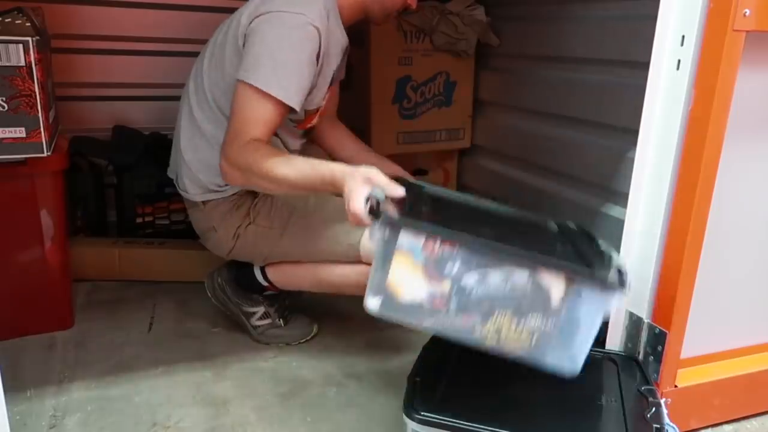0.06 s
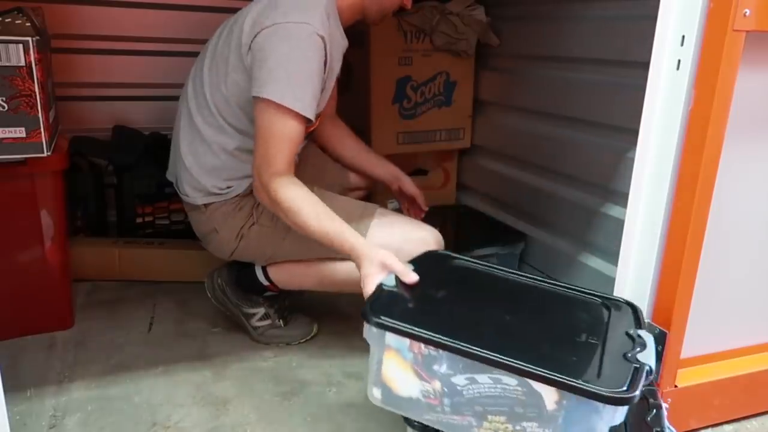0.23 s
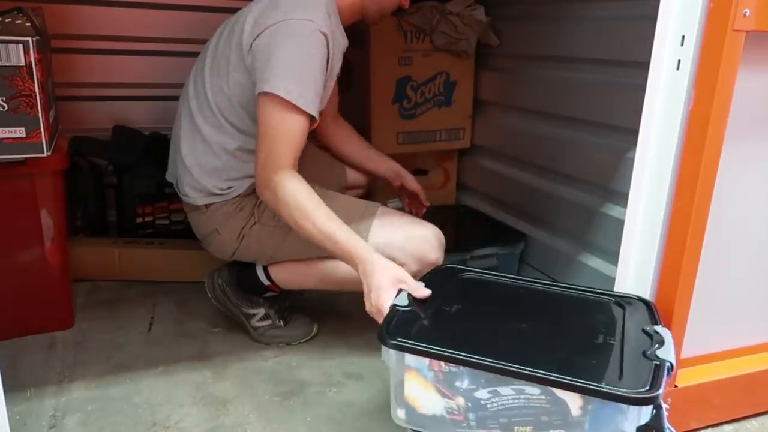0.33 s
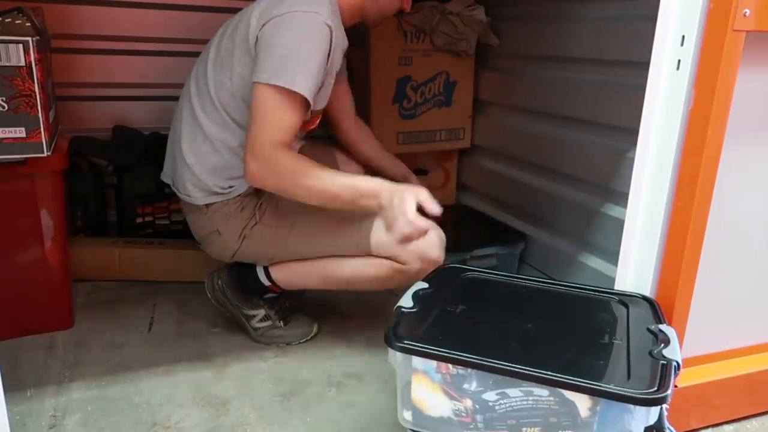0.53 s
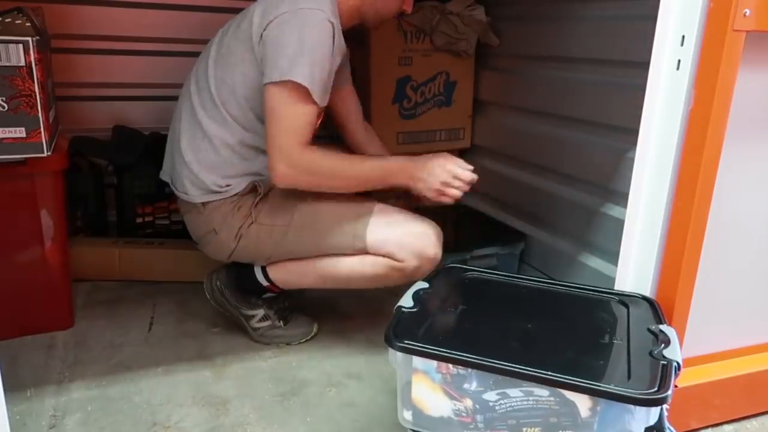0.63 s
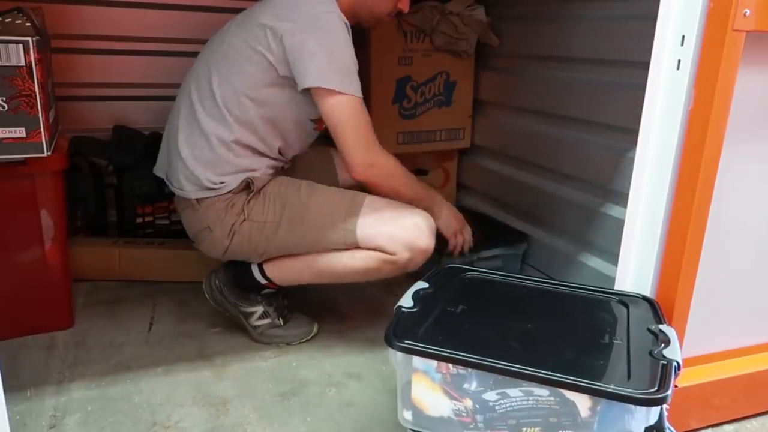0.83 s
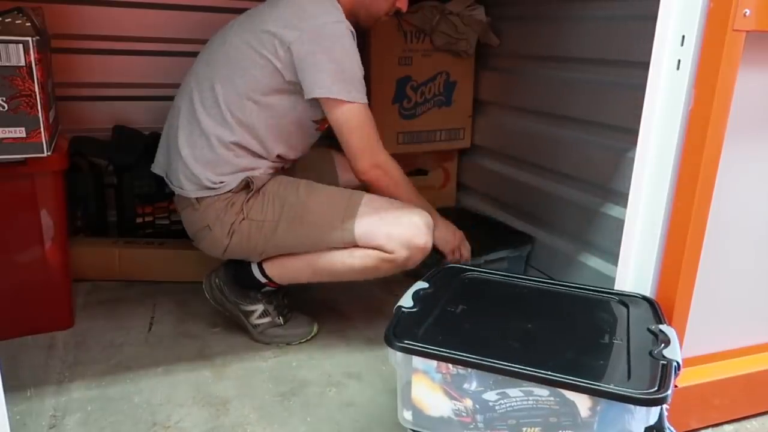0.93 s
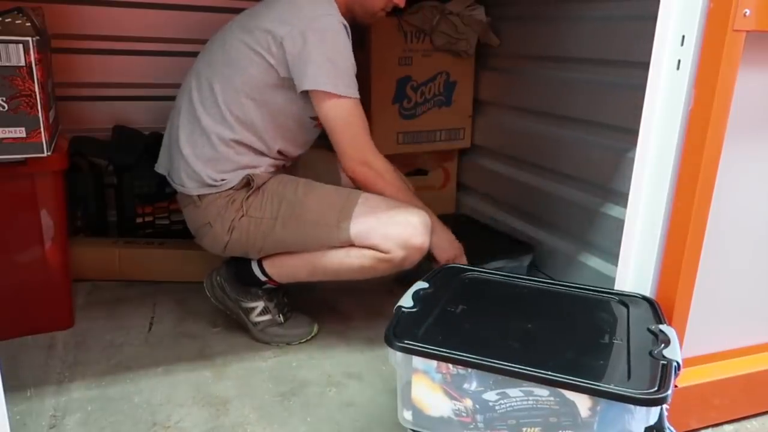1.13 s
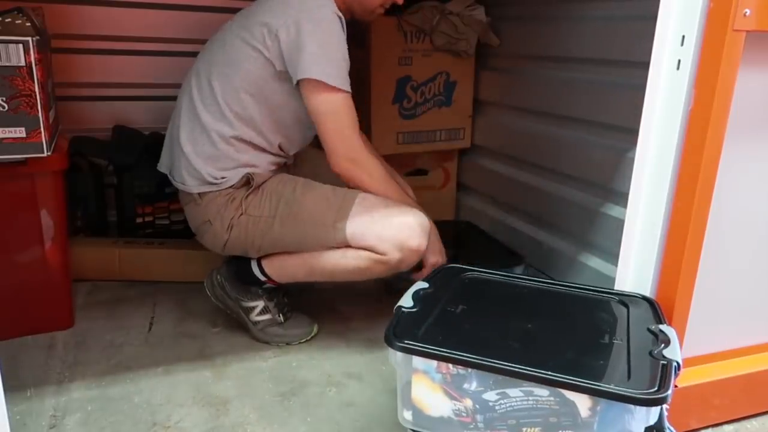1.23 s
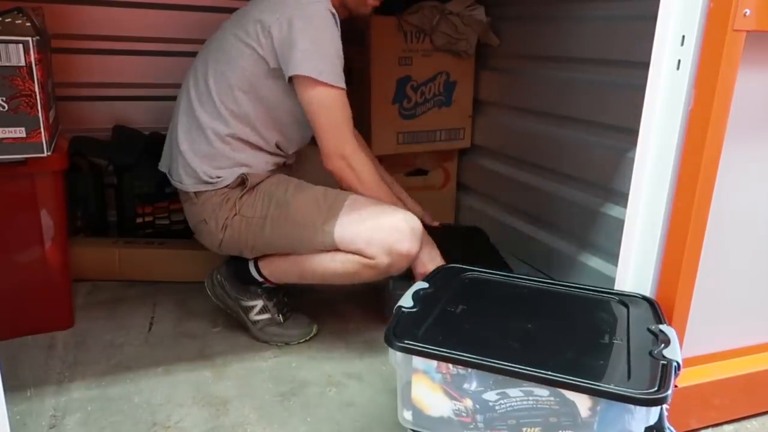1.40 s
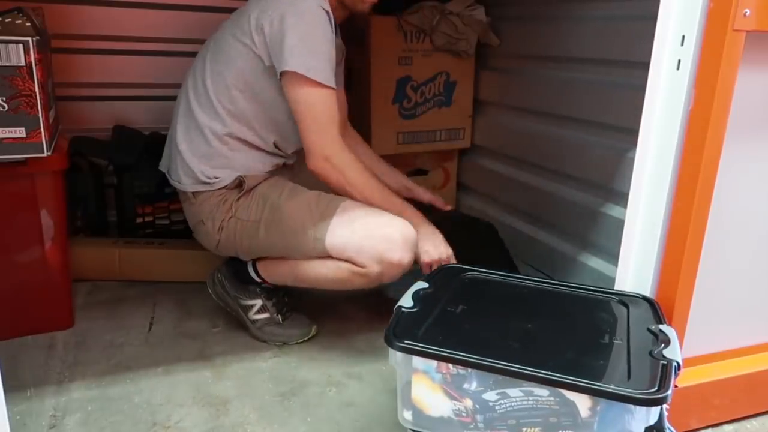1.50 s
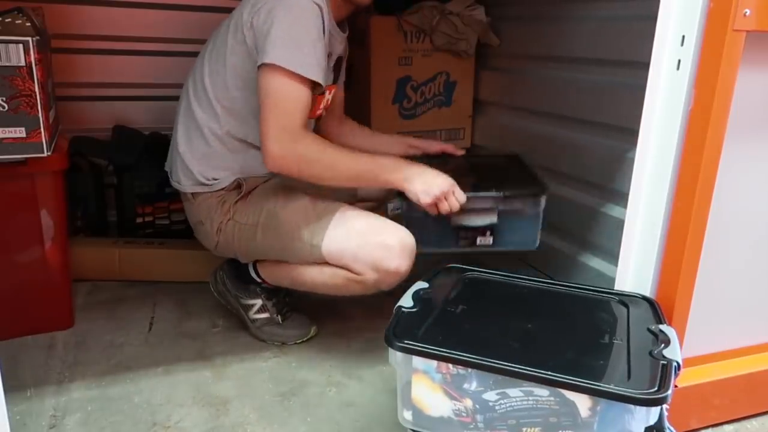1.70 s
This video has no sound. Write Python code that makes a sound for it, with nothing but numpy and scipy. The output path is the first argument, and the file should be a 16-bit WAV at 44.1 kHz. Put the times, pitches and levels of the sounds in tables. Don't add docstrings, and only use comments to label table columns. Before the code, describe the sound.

Hollow plastic tote clunks down and rattles, followed by a harsh gritty drag over a concrete floor

```python
import sys
import numpy as np
from scipy import signal
from scipy.fft import rfft, irfft
from scipy.io import wavfile

SR = 44100
rng = np.random.default_rng(int(sys.argv[2]) if len(sys.argv) > 2 else 0)


def boost(x):
    u = np.asarray(x, float) / 20
    return 10 ** u


def materialize(psi):
    bounded = np.clip(np.atleast_2d(psi).T, -1, 1)
    quanta = np.round(bounded * 32767).astype(np.int16)
    wavfile.write(sys.argv[1], SR, quanta)


N = 77175

# start_s, edge_db (hard edge), body_db (hollow body)
TOTE_CONTACTS = [(0.2455, -1.5, 0), (0.247, -7, -6), (.250, -18, -1), (0.2547, -1.5, -9), (.2562, -8, -13),
                 (0.2586, -5.5, -5), (.2625, -5, -6.5), (0.268, -3, -9), (.278, -11, -6),
                 (0.2847, -11.5, -5.5), (.293, -33, -7.5), (.369, -50, -20), (0.377, -43, -43),
                 (0.3853, -27, -27), (0.385, -17, -33), (0.393, -18, -24), (.428, -14.5, -34),
                 (0.438, -32, -18.5), (0.439, -17, -52), (0.447, -18, -40), (0.8911, -37, -36)]
# freq_hz, level_db (per Hz)
PLASTIC_COLOUR = [(180, -11.5), (300, -17), (392, -19), (478, 5), (645, -5), (2360, -3.5), (6300, -19.5),
                  (9500, -38.5), (15200, -59), (16000, -59)]
# freq_hz, level_db (per Hz)
HEAVY_GRIT = [(120, -29), (470, -16), (1030, -6), (2380, 0.5), (4100, -8.5), (5500, -21), (9500, -40.5),
              (15500, -65)]
RIM_CUT_HZ = 6000


def rms_one(x):
    return x / np.sqrt(np.mean(x ** 2) + 1e-20)


def in_time(rows, beyond=None, column=1):
    rows = np.array(rows)
    return np.interp(np.arange(N) / SR, rows[:, 0], rows[:, column], left=beyond, right=beyond)


def butter(x, order, hz, kind="low"):
    return signal.sosfilt(signal.butter(order, hz, kind, fs=SR, output="sos"), x)


def colour(x, points, peaks=()):
    size = 8192
    hz = np.maximum(np.arange(size // 2 + 1) * SR / size, 1)
    point_hz, point_db = np.array(points).T
    db = np.interp(np.log(hz), np.log(point_hz), point_db)
    for centre, width, lift in peaks:
        db = db + lift / (1 + (2 * (hz - centre) / width) ** 2)
    cepstrum = irfft(np.log(boost(db)))
    cepstrum[1:size // 2] *= 2
    cepstrum[size // 2 + 1:] = 0
    return signal.fftconvolve(x, irfft(np.exp(rfft(cepstrum))))[:len(x)]


def drift(rate):
    r = np.exp(-32 * np.pi * rate / SR)
    slow = signal.lfilter([1], [1, -2 * r, r * r], rng.standard_normal(N // 16 + 1002))[1000:]
    return np.interp(np.arange(N) / 16, np.arange(len(slow)), rms_one(slow))


def ring(clicks, hz, t60):
    r = boost(-60 / (t60 * SR))
    w = 2 * np.pi * hz / SR
    return signal.lfilter([0, np.sin(w)], [1, -2 * r * np.cos(w), r * r], clicks + 1e-18)


def grains(per_s, uneven_db, clump_db):
    sizes = boost(uneven_db * np.minimum(rng.exponential(1, N), 4)) * rng.choice([-1, 1], N)
    hits = rng.random(N) < per_s * boost(clump_db * drift(120.)) / SR
    return rms_one(sizes * hits)


def steady_noise(swell, spectrum, patchy_db, rate):
    noise = colour(rng.standard_normal(N + SR), spectrum)[SR:]
    return boost(in_time(swell) + patchy_db * drift(rate)) * rms_one(noise)


def panel_hits(events):
    out = np.zeros(N)
    for at, hz, db, t60 in events:
        click = np.zeros(N)
        click[int(max(at, TOTE_CONTACTS[0][0]) * SR)] = 1
        out += boost(db - 3) * ring(click, hz, t60)
        out += boost(db - 9) * ring(click, hz * 0.95, t60)
    return colour(out, [(1, 0), (RIM_CUT_HZ, 0), (1.47 * RIM_CUT_HZ, -24), (SR / 2, -80)])


def traffic():
    # start_s, level_db
    swell = [(0, -36.5), (.1, -34.5), (.22, -33.5), (.5, -46.5), (.7, -43), (1.0, -37.5), (1.5, -38.5),
             (1.65, -39), (1.75, -36.5)]
    # freq_hz, level_db (per Hz)
    spectrum = [(12, 8), (20, -34), (54, -3.5), (113, -5), (151, -7.5), (401, -4), (431, -4.5), (507, -7),
                (1500, -22), (1950, -80), (3300, -120)]
    return steady_noise(swell, spectrum, patchy_db=1.5, rate=3.1)


def road_hiss():
    # start_s, level_db
    swell = [(0, -42.5), (.2, -42), (.55, -48), (.7, -49), (.88, -47.5), (1.75, -42)]
    # freq_hz, level_db (per Hz)
    spectrum = [(410, -12.5), (1030, -2), (2490, -0.5), (4130, -14), (7000, -28), (9850, -39), (13000, -39),
                (15500, -47)]
    return steady_noise(swell, spectrum, patchy_db=1.2, rate=6.3)


def drones():
    # start_s, low_db, middle_db, upper_db
    levels = [(0, -52, -53, -49), (.1, -57, -53.5, -46), (.2, -39, -45, -68), (.35, -54, -51, -57),
              (.4, -43.5, -50, -45), (.5, -52, -57, -61), (.7, -50, -51, -57), (1.0, -56, -48, -64),
              (1.2, -56, -59, -54), (1.6, -56, -64, -57), (1.7, -44, -67, -52), (1.75, -34, -53, -44)]
    out = np.zeros(N)
    for column, hz, t60 in ((1, 60.8, 0.58), (2, 119.6, 0.31), (3, 365, 0.026)):
        tone = rms_one(ring(rng.standard_normal(N + SR), hz, t60)[SR:])
        out += boost(in_time(levels, column=column)) * tone
    return out


def strikes(db, modes):
    at = (np.array(TOTE_CONTACTS)[:, 0] * SR).astype(int)
    spread_db = 4.5 * rng.standard_normal((len(at), len(modes)))
    out = np.zeros(N)
    for k, (hz, level_db, t60) in enumerate(modes):
        clicks = np.zeros(N)
        clicks[at] = boost(db + level_db - 11.0 + spread_db[:, k])
        out += ring(clicks, hz, t60) * (-1) ** k
    return out


def tote_knocks():
    # freq_hz, level_db, t60_s
    body_modes = [(72, -24, 0.13), (162, -12, 0.13), (206.6, -7.5, 0.11), (253, 0.5, 0.043),
                  (405, -12.5, 0.054), (502.5, -4.5, 0.079), (570, -9, 0.052), (698, -17, 0.15)]
    # freq_hz, level_db, t60_s
    rim_modes = [(940, -5, 0.017), (1177, -13, 0.041), (1417, -9.5, 0.059), (1800, -11, 0.014),
                 (1960, -5.5, 0.019), (2255, -1.5, 0.017), (2660, -11, 0.017), (3180, -9, 0.023),
                 (3540, -7, 0.009), (4230, -25, 0.031), (5130, -31, 0.015), (5940, -40, .015),
                 (6750, -40, 0.0073)]
    start_s, edge_db, body_db = np.transpose(TOTE_CONTACTS)
    boom = butter(strikes(body_db, body_modes), 2, 970)
    rim = butter(strikes(edge_db, rim_modes), 8, RIM_CUT_HZ)
    clicks = np.zeros(N)
    clicks[(start_s * SR).astype(int)] = boost(edge_db * 1.3 - 13.5)
    crack_s = 0.0025
    burst = signal.lfilter([1], [1, -np.exp(-1 / (crack_s * SR))], clicks + 1e-18)
    crack = burst * rms_one(colour(rng.standard_normal(N), PLASTIC_COLOUR))
    return boom + rim + crack


def slaps():
    # start_s, pitch_hz, level_db, t60_s
    blows = [(.2465, 65.7, -22.5, 0.38), (.2475, 3800, -37, 0.013), (0.2, 132, -33, 0.43),
             (.254, 494, -14, 0.057), (.2545, 172, -13, 0.058), (.2555, 6100, -18, 0.022),
             (.2585, 205, -11, 0.12), (0.23, 196, -16.5, .08), (.252, 720, -20, .07),
             (.2535, 900, -19, 0.047), (0.28, 6100, -26, .03), (.259, 277, -16.5, 0.11),
             (.283, 6500, -22, .03), (.2555, 4200, -22, .015), (.2615, 2100, -16, .015),
             (0.3695, 480, -24.5, 0.06), (.384, 1360, -24, 0.045), (0.391, 245, -28, 0.062),
             (.4405, 3220, -22, 0.018), (.4462, 229, -18.5, 0.1), (.4465, 443, -31, 0.033),
             (.428, 1700, -20, 0.0099), (.268, 3700, -20, .012), (0.8876, 3100, -25.5, 0.038),
             (1.2455, 2200, -7, 0.025), (1.2685, 2260, -7.5, 0.039), (1.326, 2600, -10, 0.012),
             (1.332, 2500, -10, 0.0097), (1.736, 370, -35, 0.21)]
    return panel_hits(blows)


def contents():
    # start_s, level_db, t60_s
    shakes = [
        (.246, -14.5, 0.24),
        (0.371, -38, 0.74),
        (0.429, -41, 0.3),
    ]
    t = np.arange(N) / SR
    settle = sum(boost(db - 60 * np.maximum(t - s, 0) / t60) * (t > s) for s, db, t60 in shakes)
    chatter = rms_one(colour(grains(2900, uneven_db=3.0, clump_db=1.0), PLASTIC_COLOUR))
    return butter(settle * chatter, 2, 370, "high")


def dust():
    # start_s, level_db
    spray = [(.886, -78), (.889, -54.5), (.95, -59.5), (1.15, -57.5), (1.25, -51), (1.34, -45), (1.45, -55),
             (1.52, -59), (1.6, -74)]
    # freq_hz, level_db (per Hz)
    spectrum = [(3000, -22), (5200, 0), (7000, -9), (10000, -18), (14500, -24), (15800, -31)]
    hiss = rms_one(colour(grains(6000, uneven_db=0.0, clump_db=1.0), spectrum))
    return boost(in_time(spray, -120)) * hiss


def drag(stroke, spectrum, per_s, uneven_db, clump_db, smooth_db):
    # centre_hz, width_hz, lift_db
    panel_humps = [(636, 230, 4.5), (1510, 110, 1), (2050, 63, 1), (2420, 140, 1), (2800, 54, 2),
                   (3430, 150, 1.5)]
    friction = grains(per_s, uneven_db, clump_db) + boost(smooth_db) * rng.standard_normal(N)
    rub = rms_one(colour(friction, spectrum, panel_humps))
    span = slice(int(stroke[0][0] * SR), int(stroke[-1][0] * SR))
    speed = 2 ** in_time(stroke, column=2)[span]
    lines = rfft(rub[span])
    octaves = np.log2(np.linspace(1, SR / 2, len(lines)))
    log_hz, db = np.log(np.array(spectrum)[:, 0]), np.array(spectrum)[:, 1]
    out = np.zeros(N)
    for centre in np.arange(6.5, 14.3, 1 / 3):
        band = irfft(lines * np.clip(1 - 3 * abs(octaves - centre), 0, 1), len(speed))
        moved_db = np.interp(np.log(2 ** centre / speed), log_hz, db)
        lift_db = moved_db - np.interp(np.log(2 ** centre), log_hz, db)
        out[span] += band * boost(lift_db + 0.9 * drift(20.)[span])
    return boost(in_time(stroke, -120)) * out


def light_drag():
    # start_s, pressure_db, speed_octaves (upward pitch shift)
    stroke = [
        (.888, -35.5, 0.18),
        (.9, -36, 0.22),
        (.95, -35.5, -0.037),
        (.98, -34, 0.049),
        (1.0, -31.5, -0.1),
        (1.155, -28.5, -0.043),
        (1.17, -25, -0.091),
    ]
    # freq_hz, level_db (per Hz)
    spectrum = [(120, -42), (240, -1.5), (480, -6), (1070, -4), (2800, 0.5), (4500, -14), (9000, -54),
                (15500, -57)]
    return drag(stroke, spectrum, per_s=2400, uneven_db=-0.5, clump_db=-1.5, smooth_db=-1.5)


def bumps():
    # start_s, pitch_hz, level_db, t60_s
    seams = [(.89, 270, -34, 0.11), (1.009, 77.6, -31, 0.25), (1.095, 440, -32, 0.07),
             (1.165, 585, -27, 0.15), (1.30, 323, -40, 0.054), (1.325, 237, -31, 0.091),
             (1.387, 230, -28.5, .08), (1.40, 416, -29.5, 0.051), (1.377, 109, -40, 0.12)]
    return panel_hits(seams)


def floor_hum():
    # start_s, level_db, pitch_hz
    bends = [(.93, -58, 690), (1.0, -36.5, 690), (1.04, -56, 620), (1.07, -32, 590), (1.13, -40.5, 640),
             (1.18, -39, 640), (1.27, -37, 690), (1.33, -38, 620), (1.40, -39.5, 600), (1.44, -60, 600)]
    turn = 2 * np.pi * np.cumsum(in_time(bends, column=2)) / SR
    width_hz = 31
    tone = drift(width_hz) * np.cos(turn) + drift(width_hz) * np.sin(turn)
    return boost(in_time(bends, -120)) * tone


def hard_drag():
    # start_s, pressure_db, speed_octaves (upward pitch shift)
    stroke = [
        (1.152, -55, -0.25),
        (1.166, -21, -0.27),
        (1.19, -25, -0.19),
        (1.215, -18, -0.22),
        (1.262, -19, 0.11),
        (1.29, -19, 0.19),
        (1.335, -17, 0.081),
        (1.385, -20, 0.0053),
        (1.478, -33.5, -0.21),
    ]
    return drag(stroke, HEAVY_GRIT, per_s=5000, uneven_db=2.0, clump_db=2.5, smooth_db=-1.0)


def stone_snaps():
    # start_s, pitch_hz, level_db, t60_s
    stones = [(1.1627, 2380, -23, 0.017), (1.1658, 2140, -22, .02), (1.210, 2050, -18, 0.017),
              (1.2371, 2090, -10.5, 0.032), (1.2397, 3000, -20, .012), (1.252, 2520, -21, 0.016),
              (1.2645, 2830, -5, .015), (1.2765, 2225, -9, 0.023), (1.2825, 3450, -13, 0.02),
              (1.2935, 2800, -13.5, .02), (1.2997, 3270, -9.5, 0.019), (1.307, 2330, -13, .03),
              (1.3184, 1860, -12, 0.041), (1.341, 2590, -16, .015), (1.347, 2860, -11, 0.017),
              (1.3852, 2500, -18, 0.016), (1.39, 1530, -11, 0.0079)]
    return panel_hits(stones)


def last_drag():
    # start_s, pressure_db, speed_octaves (upward pitch shift)
    stroke = [
        (1.46, -51, -0.058),
        (1.485, -35, -0.002),
        (1.512, -28.5, -0.31),
        (1.546, -36, -0.15),
        (1.6, -55, -0.13),
    ]
    return drag(stroke, HEAVY_GRIT, per_s=2500, uneven_db=3.0, clump_db=0.0, smooth_db=7)


def steel_room(x):
    split_hz, low_t60_s, high_t60_s, build_s = 6050, 0.49, 0.49, 0.0025
    t = np.arange(SR) / SR
    low = butter(rng.standard_normal(SR), 2, split_hz) * boost(-60 * t / low_t60_s)
    high = butter(rng.standard_normal(SR), 2, split_hz, "high") * boost(-60 * t / high_t60_s)
    tail = (low + high) * (1 - np.exp(-t / build_s))
    return boost(-16.5) * signal.fftconvolve(x, tail / np.sqrt(np.sum(low ** 2)))[:N]


def scattered(x):
    count = SR // 10
    smear = rng.standard_normal(count) * np.exp(-np.arange(count) / (0.015 * SR))
    return signal.fftconvolve(x, smear / np.sqrt(np.sum(smear ** 2)))[:N]


def scene():
    # freq_hz, level_db
    port_side = [(60, -45), (200, -35), (400, -26), (1300, -23.5), (2400, -21), (4400, -9), (8100, 0),
                 (15000, 2)]
    tote = tote_knocks() + slaps() + contents()
    dragged = dust() + light_drag() + bumps() + hard_drag() + stone_snaps() + last_drag()
    near = tote + dragged
    far = steel_room(near) + traffic() + road_hiss()
    tones = drones() + floor_hum()
    mid = near + far + tones
    side = colour(scattered(near) + boost(6) * scattered(far), port_side)
    side = side + boost(-41) * tones
    return np.array([mid + side, mid - side])


def roll_off(x):
    return signal.sosfilt(signal.butter(12, 16480, fs=SR, output="sos"), x)


def record(dry):
    rounded = 1.6 * np.tanh(dry / 1.6)
    mix = signal.sosfilt(signal.cheby2(10, 60, 16500, fs=SR, output="sos"), rounded)
    return roll_off(mix)


dry = scene()
out = record(dry)
materialize(out)
```